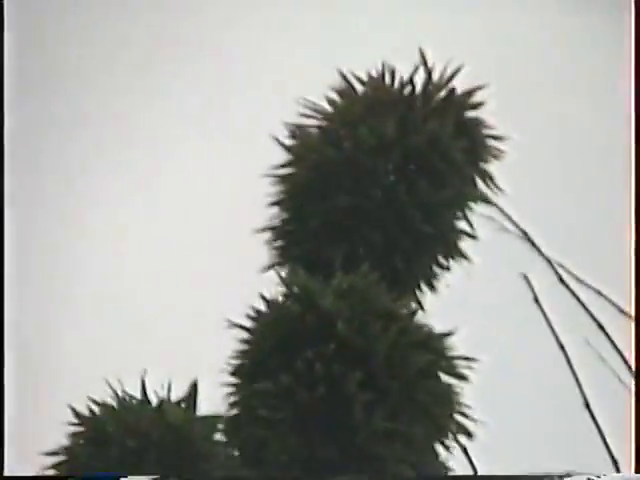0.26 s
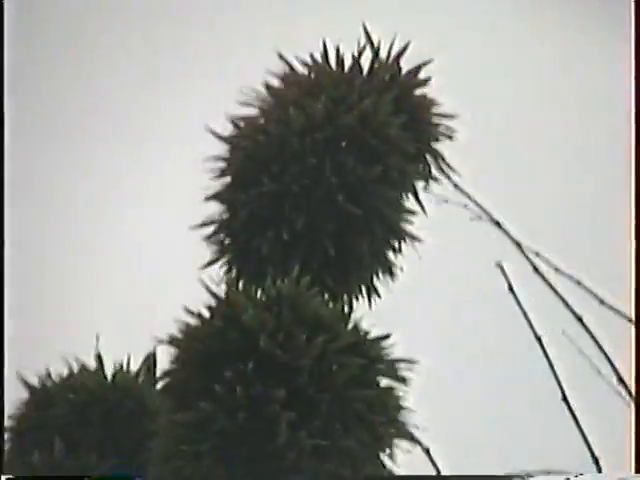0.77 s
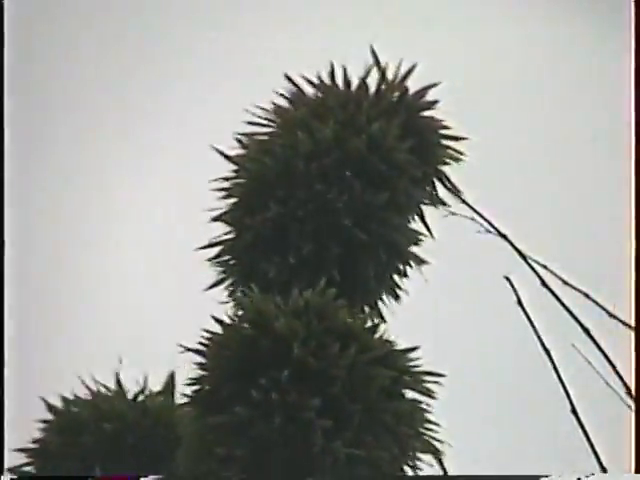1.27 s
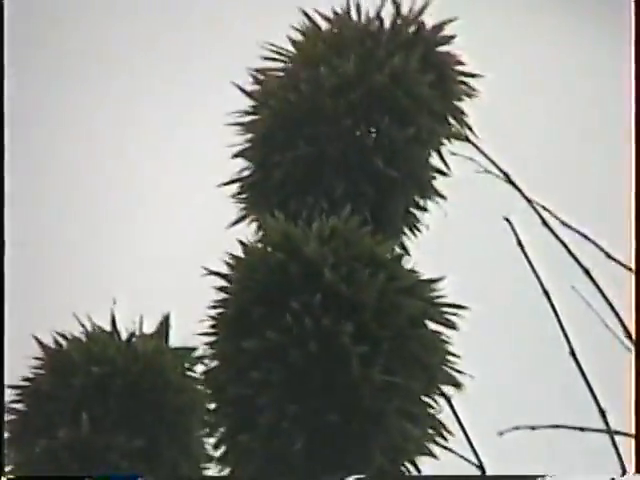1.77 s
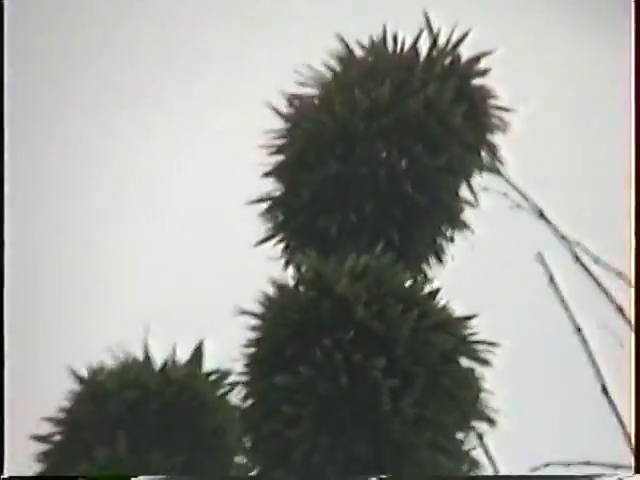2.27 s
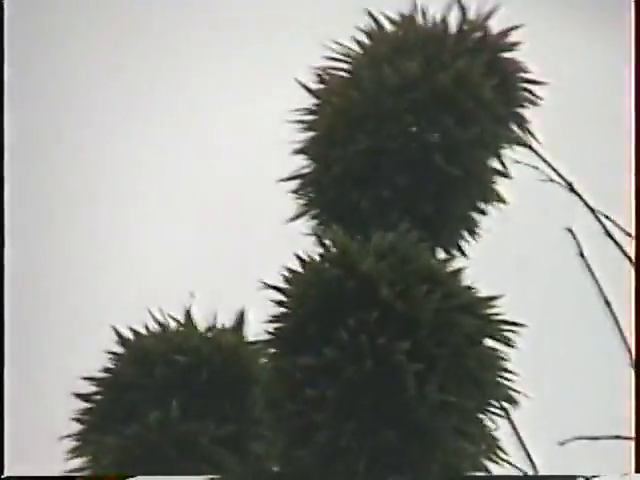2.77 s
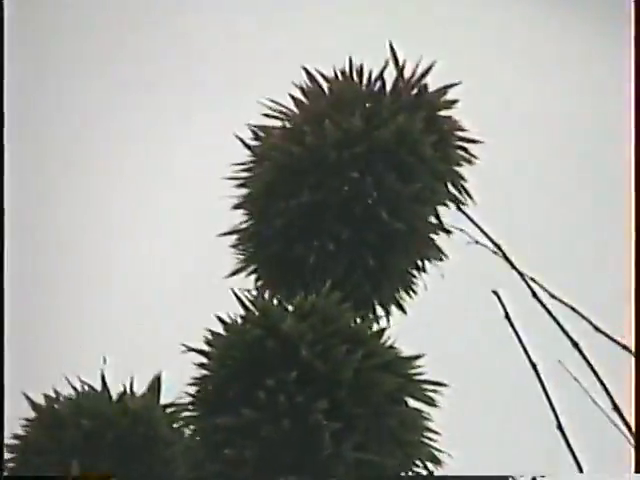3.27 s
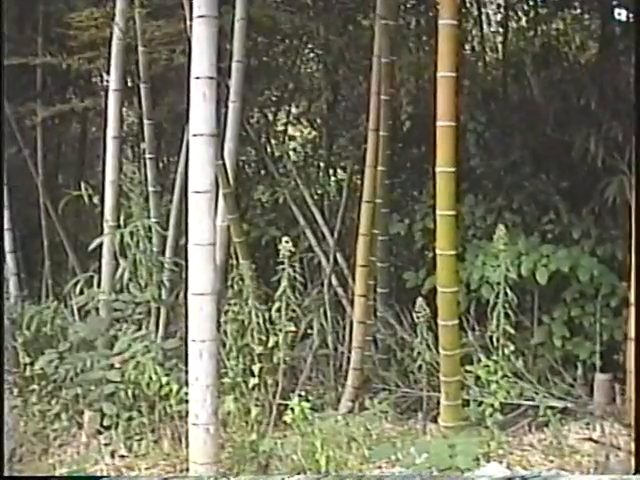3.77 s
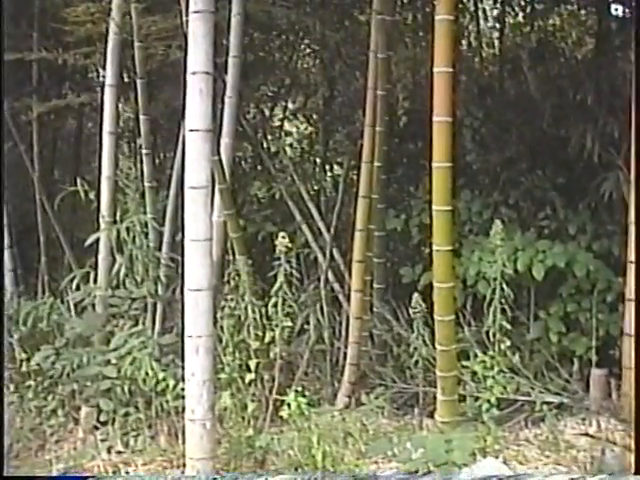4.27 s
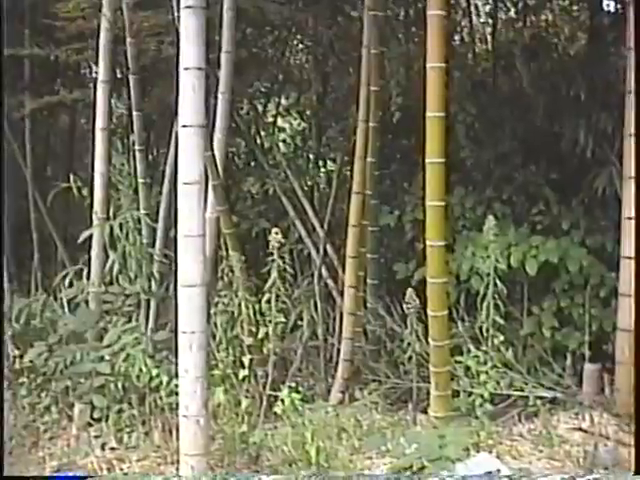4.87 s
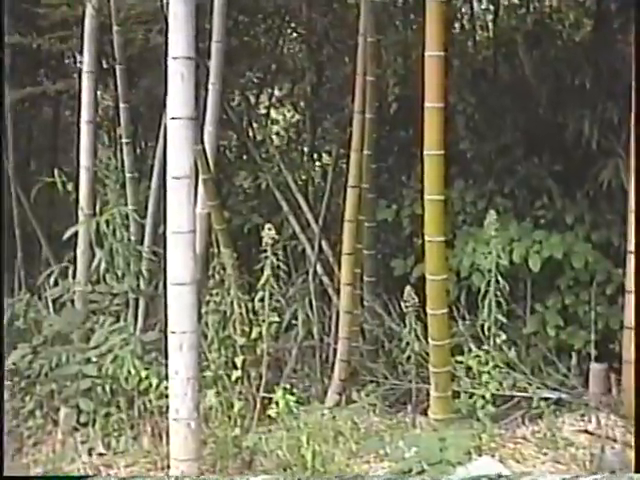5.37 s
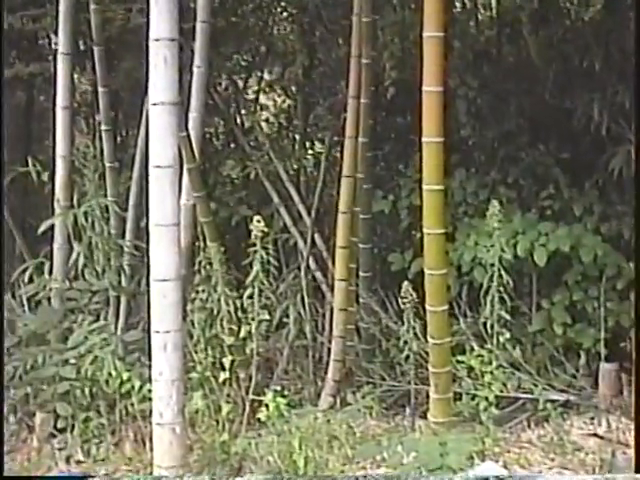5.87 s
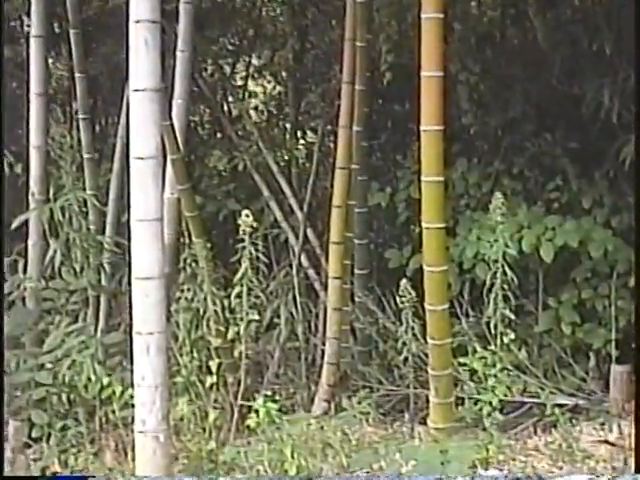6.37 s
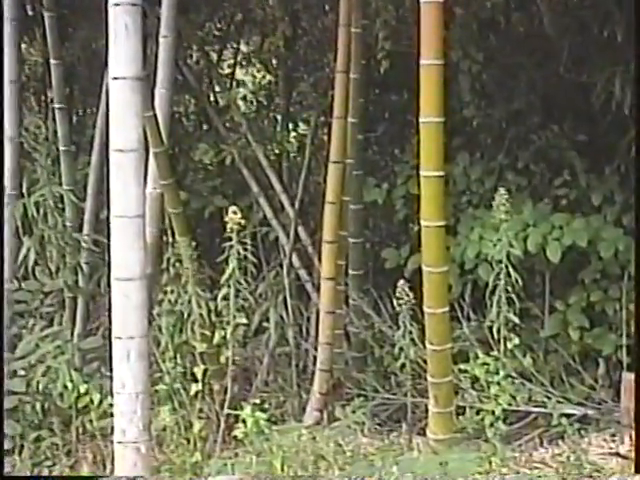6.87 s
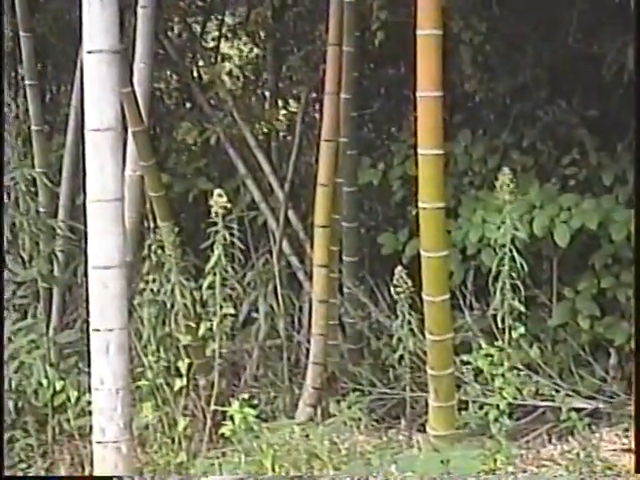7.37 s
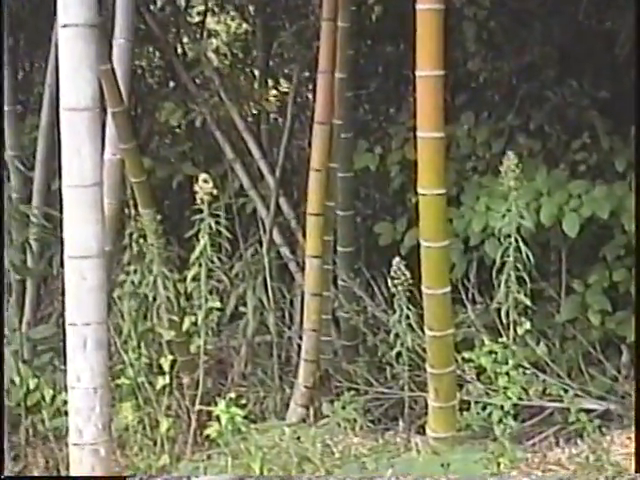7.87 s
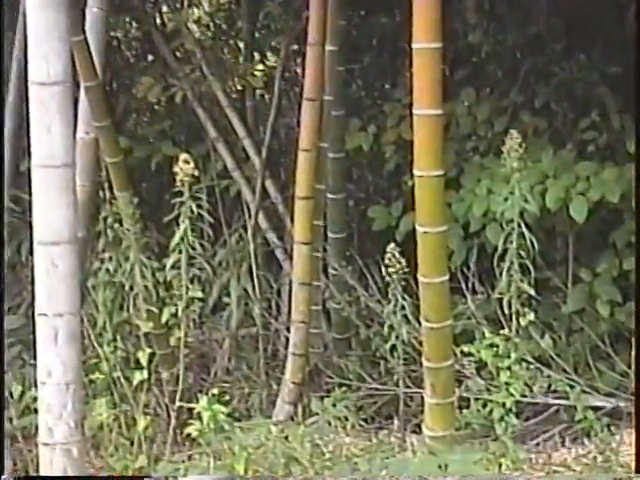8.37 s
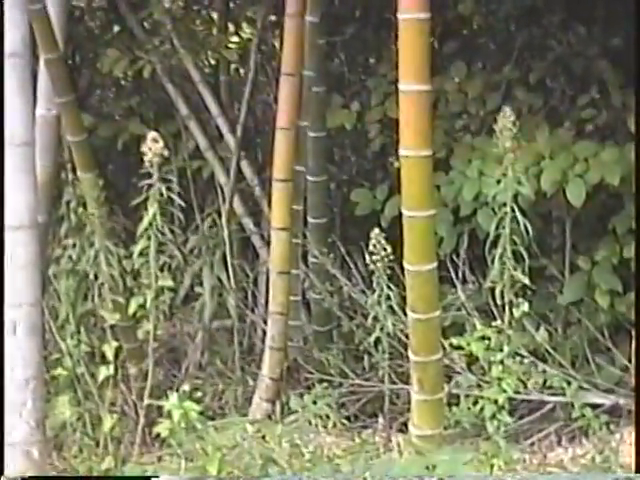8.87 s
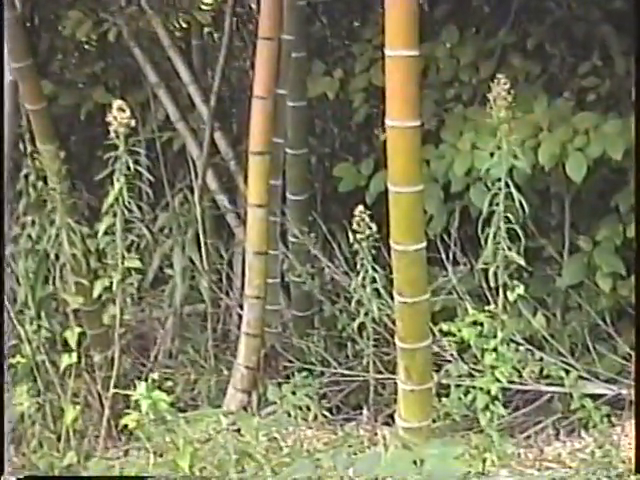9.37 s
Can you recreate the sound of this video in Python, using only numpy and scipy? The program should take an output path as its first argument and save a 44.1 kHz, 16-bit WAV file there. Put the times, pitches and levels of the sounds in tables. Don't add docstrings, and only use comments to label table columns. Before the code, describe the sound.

A quiet leafy garden heard through a small camcorder, almost entirely in the left channel. Its mechanism buzzes steadily and the lens motor ticks quickly for the first three seconds, with a hard tap just before the end. Small birds give short whistles and chips, a cricket trills faintly, a distant crow caws mid-way and a nearer one calls about two seconds later.

```python
import sys
import numpy as np
from scipy import signal
from scipy.fft import rfft, irfft
from scipy.io import wavfile
from scipy.ndimage import uniform_filter1d

SR = 44100
rng = np.random.default_rng(int(sys.argv[2]) if len(sys.argv) > 2 else 0)


def put_to_file(sound):
    columns = np.atleast_2d(sound).T
    safe = np.clip(columns, -1, 1)
    whole_steps = np.round(safe * 32767)
    wavfile.write(sys.argv[1], SR, whole_steps.astype(np.int16))


def amplitude_ratio(level_db):
    exponent = np.asarray(level_db, float) / 20
    return 10 ** exponent


N = 424683
CUT_S = 3.44
FRAME_S = np.arange(N // 128 + 5) * 128 / SR
BIN_HZ = np.fft.rfftfreq(512, 1 / SR)[:, None]


def evened(x):
    return x / np.sqrt(np.mean(x ** 2) + 1e-20)


def read(points, hz):
    f, value = np.transpose(points)
    return np.interp(np.log(hz + 1), np.log(f + 1), value)


def add(mix, s, sound):
    part = mix[round(s * SR):][:len(sound)]
    part += sound[:len(part)]


def unroll(rows):
    s, *columns = np.transpose(rows)
    t = np.arange(s[0], s[-1], 1 / SR)
    return t, [np.interp(t, s, c) for c in columns]


def wander(count, hz):
    size = max(int(SR / hz), 2)
    smooth = uniform_filter1d(rng.standard_normal(count), size)
    return evened(uniform_filter1d(smooth, size))


def resonate(x, hz, width):
    turn = np.exp(2j * np.pi * np.cumsum(hz * np.ones(len(x))) / SR)
    r = np.exp(-np.pi * width / SR)
    return 2 * (turn * signal.lfilter([1 - r], [1, -r], x / turn)).real


def noise(field_db, patchy_db):
    a, b, patches = rng.standard_normal((len(FRAME_S), 257, 3)).T
    patches = uniform_filter1d(patches, size=5, axis=0)
    patches = evened(uniform_filter1d(patches, size=20, axis=1))
    z = (a + 1j * b) * amplitude_ratio(field_db + patchy_db * patches)
    return signal.istft(z, nperseg=512, noverlap=384)[1][:N] * np.sqrt(SR / 512)


def peaks_db(rows, t, rise_db, floor_db):
    s, db, fall = (c[:, None] for c in np.transpose(rows)[:3])
    rise = rise_db * (s - t)
    decay = 10 * (t - s) / np.maximum(fall, .005)
    each = db - np.where(t < s, rise, decay)
    return np.maximum(each.max(0), floor_db), each.argmax(0)


def echoes(x, t60, start_s):
    at = np.arange(int(start_s * SR), SR, 24)
    taps = np.zeros(SR + 24)
    signs = rng.choice([-1., 1.], len(at))
    taps[at + rng.integers(0, 24, len(at))] = signs * amplitude_ratio(-60 * at / SR / t60)
    return signal.oaconvolve(x, taps / np.linalg.norm(taps))[:N]


def sing(out, rows, bend, fade_db):
    for s, length, from_hz, to_hz, db in rows:
        t = np.arange(0, length, 1 / SR)
        u = t / length
        hz = from_hz + (to_hz - from_hz) * bend(u)
        hz = hz * (1 + .009 * wander(len(t), 120))
        flutter = wander(len(t), 200)
        level_db = db + fade_db(u) + 2.5 + 2.6 * (flutter - flutter.mean())
        edges = np.minimum(1, np.minimum(t, length - t) / .002)
        add(out, s, np.sin(2 * np.pi * np.cumsum(hz) / SR) * amplitude_ratio(level_db) * edges)


# start t/s, length t/s, from f/Hz, crest f/Hz, level/dB
WHISTLES = [(.87, 0.073, 2267, 2450, -62), (1.43, 0.033, 4203, 4320, -54), (3.55, 0.058, 3270, 3280, -60),
            (4.028, 0.034, 3360, 3440, -59), (4.57, 0.14, 3190, 3340, -59.5), (4.915, .03, 4100, 4180, -58),
            (5.04, 0.17, 2980, 3440, -61.5), (5.25, 0.15, 3240, 3490, -57),
            (6.012, 0.09, 3200, 3330, -53.5), (6.085, .12, 3350, 3400, -62), (6.54, 0.09, 3200, 3310, -55),
            (1.295, .035, 4200, 4280, -58), (6.04, .02, 4950, 4960, -62), (6.57, 0.036, 4930, 4950, -62),
            (1.225, .03, 3800, 3900, -62), (7.045, 0.11, 3150, 3460, -57), (7.68, 0.035, 3500, 3600, -59),
            (7.725, 0.035, 3560, 3590, -60), (8.172, .1, 2950, 3330, -56.5), (9.44, 0.16, 3320, 3424, -55)]
# start t/s, length t/s, from f/Hz, to f/Hz, level/dB
CLIMBS = [(1.135, 0.024, 3540, 4900, -57), (1.137, .022, 1200, 3600, -57),
          (1.393, 0.033, 3550, 4300, -53.5), (7.645, .04, 3150, 3500, -57),
          (3.985, 0.049, 2980, 3370, -57.5), (8.62, .014, 3300, 4000, -56), (4.865, 0.055, 3350, 4103, -57),
          (2.4, .02, 2060, 2900, -65), (2.66, 0.046, 3070, 3700, -54), (2.7, 0.044, 3640, 3740, -48.5),
          (2.74, 0.076, 3840, 4380, -49), (5.055, 0.047, 4700, 5170, -62), (5.425, 0.031, 3820, 3950, -54),
          (5.452, 0.027, 3980, 4370, -53.5), (8.635, 0.067, 3270, 3850, -52.5),
          (8.699, 0.015, 3780, 4120, -45.5), (8.652, 0.022, 5050, 5450, -60), (8.8, .03, 1900, 2800, -64),
          (8.714, 0.0356, 4180, 4680, -47.5), (8.78, 0.036, 3330, 4120, -51)]
# start t/s, length t/s, from f/Hz, to f/Hz, level/dB
CHIPS = [(1.18, 0.019, 3720, 3350, -56), (1.198, .02, 3200, 2400, -60), (1.295, 0.016, 4950, 4750, -55),
         (4.805, .015, 3340, 3050, -61), (8.788, .01, 5750, 5350, -60), (2.815, 0.015, 4430, 2610, -53),
         (4.053, 0.041, 5140, 4280, -65), (4.06, 0.028, 3310, 2850, -50), (5.478, 0.012, 4310, 3660, -55),
         (6.095, .028, 5490, 3500, -54), (6.117, 0.016, 5640, 4970, -62), (6.128, 0.032, 5000, 4900, -64),
         (6.61, 0.023, 4900, 3800, -59), (7.14, .015, 4600, 3520, -66), (7.7, .03, 5330, 4900, -65),
         (8.25, 0.024, 2740, 2020, -60), (8.267, 0.01, 4060, 3620, -53), (8.277, 0.014, 3640, 3300, -54),
         (8.27, 0.026, 5670, 5100, -60), (8.3, 0.038, 5580, 5450, -65), (8.747, .01, 4700, 4200, -45),
         (8.757, .01, 4150, 3100, -52), (8.757, .018, 4700, 4300, -56), (8.772, .009, 4050, 3350, -59),
         (9.56, 0.031, 3030, 2470, -62)]


def birds():
    crest, droop = 0.504, 0.13

    def arch(u):
        return 1 - np.where(u < crest, 1, droop) * (1 - u / crest) ** 2

    def straight(u):
        return u

    out = np.zeros(N)
    sing(out, WHISTLES, arch, lambda u: np.interp(u, [0, .42, 1], [-5, 0, -8]))
    sing(out, CLIMBS, straight, lambda u: -6 * (1 - u))
    sing(out, CHIPS, straight, lambda u: -1 * u)
    return out + amplitude_ratio(-7.5) * echoes(out, t60=.25, start_s=.006)


# start t/s, length t/s, from f/Hz, to f/Hz, final level/dB
TRILLS = [(0.783, .17, 4650, 4830, -76), (1.452, 1.38, 4570, 4695, -64), (2.618, 0.82, 4670, 4747, -61),
          (1.518, 0.58, 4880, 4900, -65), (5.47, 0.48, 4520, 4560, -62.5), (6.349, 0.26, 4580, 4570, -63.5),
          (6.914, 0.28, 4640, 4690, -61.5), (7.171, .27, 4700, 4720, -57.5), (7.44, .1, 4740, 4750, -64),
          (7.64, 0.15, 4540, 4620, -60), (7.798, 0.72, 4676, 4753, -57), (8.5, 0.16, 4800, 4740, -62),
          (8.768, 0.67, 4645, 4810, -56.5), (9.44, 0.19, 4860, 4810, -66)]


def cricket():
    stroke_hz, start_db, edge_s = 26.13, -4.5, 0.035
    out = np.zeros(N)
    for s, length, from_hz, to_hz, db in TRILLS:
        t = np.arange(0, length, 1 / SR)
        hz = from_hz + (to_hz - from_hz) * t / length
        level_db = db + start_db * (1 - t / length)
        edges = np.minimum(1, np.minimum(t, length - t) / edge_s)
        stroke = np.cumsum(stroke_hz * (1 + 0.015 * wander(len(t), 7.6))) / SR
        gate = .46 + np.clip(.7 - 1.2 * np.cos(2 * np.pi * stroke), 0, .7)
        gate = gate * (1 + .5 * np.cos(8 * np.pi * stroke))
        gate = gate * amplitude_ratio(3 * wander(len(t), 160) + .8 * wander(len(t), 20))
        turn = 2 * np.pi * np.cumsum(hz + 20 * wander(len(t), 200)) / SR
        wing = np.sin(turn) + amplitude_ratio(-27.0) * np.sin(2 * turn)
        add(out, s, edges * amplitude_ratio(level_db) * evened(gate * wing))
    return 1.06 * out + amplitude_ratio(-8.0) * echoes(out, t60=0.29, start_s=0.0034)


# t/s, half the pulse pitch f/Hz, effort level/dB, roughness/1
NEAR_CAW = [
    (6.769, 161, -50, 0.3),
    (6.795, 173.3, -36.5, 0.43),
    (6.845, 181.8, -37, 0.2),
    (6.93, 169.1, -33.5, 0.24),
    (7.005, 160.7, -39, 0.4),
    (7.06, 152, -38, 0.3),
    (7.1, 145.2, -41.5, 0.3),
    (7.15, 136.5, -37, 0.25),
    (7.235, 119, -53, 0.45),
]
# t/s, half the pulse pitch f/Hz, effort level/dB, roughness/1
FAR_CAW = [
    (4.645, 199, -57, .1),
    (4.7, 199.5, -54, .12),
    (4.76, 190, -56, .3),
    (4.81, 187, -54, .35),
    (4.84, 181, -52.5, .25),
    (4.89, 172, -60, .45),
    (4.935, 165, -56, .4),
    (5.0, 158, -68, .6),
]


def crows():
    near = caw(NEAR_CAW, odd_db=-12.5, swell_db=2.5)
    far = caw(FAR_CAW, odd_db=-6, swell_db=0)
    core_hz = np.interp(np.arange(N) / SR, [4.74, 4.84, 4.95], [1200, 1450, 1360])
    far = 1.11 * resonate(far, core_hz, 420)
    near_echo = amplitude_ratio(-10.0) * echoes(near, t60=0.91, start_s=.012)
    far_echo = amplitude_ratio(-4.5) * echoes(far, t60=0.9, start_s=.01)
    return near + near_echo + 0.61 * far + far_echo


# f/Hz, width f/Hz, level/dB
THROAT = [(382, 185, -18), (690, 520, -19.5), (1010, 220, -10), (1235, 150, -2.5), (1366, 150, 2),
          (1545, 110, -2.5), (1697, 176, -12), (2280, 490, -21.5)]


def caw(rows, odd_db, swell_db):
    t, (hz, effort_db, rough) = unroll(rows)
    since = t - t[0]
    length = t[-1] - t[0]
    hz = uniform_filter1d(hz, size=800)
    swell_db = swell_db * np.cos(2 * np.pi * 1351 / hz)
    low_db = -swell_db - 2 * since / length
    turns = np.cumsum(hz * (1 + 0.0056 * wander(len(t), 120))) / SR
    odd_curve = np.interp(since, [0, .07, .16, length], [1, .1, .75, 1.1])
    folds = np.zeros(len(t))
    for k in range(2, 18):
        f = k * hz
        partial_db = (1.2 if k < 7 else 2.4) * wander(len(t), 30)
        partial_db = partial_db - 10 * np.exp(-since / .04) * (f > 1480)
        partial_db = partial_db + (k % 2) * (odd_db * odd_curve - 8 * (k < 7))
        partial_db = partial_db - 45 * np.maximum(f / 1850 - 1, 0) + low_db * (k < 6)
        for dead_hz, width_hz, depth_db in [(880, 95, 12), (655, 22, 9.8), (1460, 36, 12)]:
            partial_db = partial_db - depth_db * np.exp(-((f - dead_hz) / width_hz) ** 2)
        folds = folds + amplitude_ratio(partial_db) * np.cos(2 * np.pi * (k * turns + rng.random()))
    puffs = evened((0.38 + np.exp(-(2 * turns % 1) / 0.091)) * rng.standard_normal(len(t)))
    rough = np.clip(rough, 0, 1)
    drive = (1 - rough) * evened(folds) + 2 * rough * puffs
    voice = np.zeros(len(t))
    for k, (f, width, db) in enumerate(THROAT):
        voice += (-1) ** k * amplitude_ratio(db) * resonate(resonate(drive, f, width), f, width)
    power = uniform_filter1d(uniform_filter1d(voice ** 2, size=900), size=900)
    voice = voice / np.sqrt(power)
    band = signal.butter(6, [2600, 5800], "band", fs=SR, output="sos")
    rasp = amplitude_ratio(-21.5) * evened(signal.sosfilt(band, puffs))
    out = np.zeros(N)
    sound = amplitude_ratio(effort_db) * (amplitude_ratio(swell_db) * voice + rasp)
    add(out, t[0], sound * signal.windows.tukey(len(t), .08))
    return out


DRUM_HZ = 59.955
# f/Hz, width f/Hz, level/dB
SHELL = [(492, 46, -5), (744, 28.3, 4), (1403, 90, -0.5), (1763, 91, 0), (3200, 310, -1), (3710, 470, -8),
         (5050, 210, -6.5)]


def drum_buzz():
    turns = np.arange(N) * DRUM_HZ / SR
    heads = np.diff(np.floor(2 * turns), prepend=0) * (1 + 0.29 * np.sign(turns % 1 - .5))
    heads = heads * amplitude_ratio(2.2 * wander(N, 45))
    ring = np.zeros(N)
    for k, (hz, width, db) in enumerate(SHELL):
        ring += (-1) ** k * amplitude_ratio(db) * resonate(heads, hz, width)
    return amplitude_ratio(-63) * evened(ring)


RING_T = np.arange(1300) / SR
# t/s, peak level/dB
STEPS = [(0.446, -54), (0.501, -56), (0.548, -55), (0.584, -52), (0.635, -52), (0.683, -48), (0.735, -50),
         (0.783, -48), (0.836, -51), (0.917, -52), (1.003, -48), (1.083, -50), (1.134, -54), (1.183, -47),
         (1.233, -47.5), (1.286, -56), (1.333, -50), (1.424, -52), (1.47, -47), (1.517, -49), (1.567, -47),
         (1.617, -46.5), (1.668, -49), (1.717, -47.5), (1.767, -46), (1.815, -52), (1.936, -48),
         (2.018, -49), (2.103, -54), (2.185, -50), (2.27, -47.5), (2.317, -50), (2.37, -48.5), (2.417, -53),
         (2.468, -50.5), (2.518, -51), (2.568, -52), (2.67, -47), (2.717, -51.5), (2.768, -53),
         (2.825, -50), (2.869, -53), (2.968, -52), (3.018, -50), (3.07, -48.5), (3.117, -47.5), (3.17, -54),
         (3.218, -48), (3.268, -51), (3.326, -51), (3.37, -47), (3.42, -51)]


def motor_ticks():
    out, t = np.zeros(N), RING_T
    for (s, db), (a, b) in zip(STEPS, rng.uniform(0.925, 1.088, (len(STEPS), 2))):
        lower = np.sin(2 * np.pi * 520 * a * t)
        upper = 1.28 * (1 - np.exp(-t / 0.0044)) * np.sin(2 * np.pi * 680 * b * t)
        add(out, s, amplitude_ratio(db + 1.5 - 60 * t / 0.051) * (lower + upper) * (1 - np.exp(-t / 0.0022)))
    return out


# t/s, peak level/dB, f/Hz
TAPS = [
    (2.3, -50, 1500),
    (2.87, -35, 1900),
    (2.8803, -38, 2100),
]


def shell_taps():
    out, t = np.zeros(N), RING_T
    for s, db, hz in TAPS:
        modes = np.sin(2 * np.pi * hz * t) + 0.78 * np.sin(2 * np.pi * 1.28 * hz * t)
        add(out, s, amplitude_ratio(db - 60 * t / 0.0064) * modes)
    return out


# t/s, level/dB, f/Hz
SQUEAKS = [(.5, -68, 5900), (2.325, -64, 5840), (2.893, -57, 5900), (3.58, -61, 6200), (3.703, -59.5, 5880),
           (4.133, -61, 6150), (4.25, -59, 5920), (4.827, -58, 5900), (7.155, -58, 5800),
           (7.693, -57, 5900), (8.26, -58, 5880), (8.823, -61, 5900), (9.39, -61, 5900), (9.49, -59, 6200)]


def reel_squeaks():
    out, t = np.zeros(N), RING_T
    for s, db, hz in SQUEAKS:
        glide = hz * (1 + 0.022 * np.exp(-t / 0.007))
        add(out, s, amplitude_ratio(db - 3.5) * np.hanning(len(t)) * np.sin(2 * np.pi * np.cumsum(glide) / SR))
    return out


# t/s, level/dB, time to lose 10 dB t/s, lift of the 4 kHz hump level/dB
RUBS = [(.01, -76, 0.3, -28), (.28, -71.5, 0.13, -1), (.5, -78, 0, -8), (0.749, -65, 0.15, 6.5),
        (1.148, -73, 0, 5), (1.225, -73, 0.5, 1), (1.3, -67.5, .06, 3.5), (1.36, -71, .25, 0),
        (1.78, -73.5, 0.5, -2), (1.856, -69, 0.08, 8.5), (2.3, -74, -2, -9), (2.42, -73.5, 1, -6),
        (2.48, -68, -0.34, -14), (2.82, -72, 0.2, 6), (2.949, -69, 0.09, 5), (3.001, -75, 0.75, -2),
        (3.3, -80, -0.5, 4), (3.43, -73, -0.34, 7), (6.105, -70.5, .08, -3), (8.765, -71, 0.07, 11)]
# f/Hz, density level/dB per Hz
RUSTLE_TONE = [(180, -43), (300, -14), (952, -5.5), (2840, -7), (4000, -7), (4980, -4), (6390, -17.5),
               (12500, -22.5), (16200, -85), (22000, -120)]


def rustle():
    floor_db = np.where(FRAME_S < CUT_S, -84, -100)
    level_db, which = peaks_db(RUBS, FRAME_S, rise_db=442, floor_db=floor_db)
    tone = read(RUSTLE_TONE, BIN_HZ) - read(RUSTLE_TONE, 8030) - 10 * np.log10(1500)
    hump = np.exp(-(np.log((BIN_HZ + 1) / 4000) / 0.16) ** 2)
    field = tone + level_db + hump * np.transpose(RUBS)[3][which]
    return noise(field, patchy_db=1.5) * amplitude_ratio(1.74 * wander(N, 170))


# t/s, level/dB, time to lose 10 dB t/s
SWELLS = [
    (.12, -55.5, 0.2),
    (3.53, -55, 1),
    (4.2, -60, 3),
    (4.75, -57.5, 0.5),
    (5.13, -55, -0.5),
    (5.4, -56.5, 0),
    (6.98, -58, 1),
    (8.2, -59, 2),
    (8.53, -57, 0),
    (8.77, -54.5, 0.6),
]


def drone():
    band = -10 * np.log10(150) - 12 * (np.log((BIN_HZ + 1) / 240) / 0.31) ** 2
    level_db = peaks_db(SWELLS, FRAME_S, rise_db=65, floor_db=-67)[0]
    return noise(band + level_db - 2.5, patchy_db=1.0)


# f/Hz, density level/dB per Hz
AIR_FIRST = [(88, -55), (150, -12), (239, -6.5), (360, -7.5), (503, -2.5), (1160, -5.5), (1450, -6.5),
             (2110, -8.5), (4770, -7), (5600, -12), (6230, -23), (8190, -18), (12800, -28), (16600, -60),
             (22000, -120)]
AIR_SECOND = [(88, -56), (150, -14), (206, -3), (573, 0), (716, 0.5), (2030, -3.5), (3350, -3.5),
              (4960, -3.5), (5550, -8.5), (6370, -17.5), (8190, -15), (11700, -21), (12800, -22.5),
              (16600, -63), (22000, -120)]


def air():
    tone = np.where(FRAME_S < CUT_S, read(AIR_FIRST, BIN_HZ), read(AIR_SECOND, BIN_HZ))
    tone = tone - 10 * np.log10(np.sum(10 ** (tone / 10), axis=0) * SR / 512)
    return noise(tone - 55, patchy_db=1.34)


# t/s, level/dB, time to lose 10 dB t/s
BURSTS = [(.15, -71, 1.5), (.92, -68.5, 0.55), (1.25, -68, 0.4), (1.74, -68, 0.5), (2.68, -70, 1.4),
          (3.45, -71, 1), (4.3, -72, 2), (5.06, -66, 0.13), (6.1, -67, 0.5), (6.55, -68.5, 0.1),
          (6.83, -67.5, 2), (7.63, -69.5, 1.3), (8.0, -65, 0), (8.47, -67, 1.3), (9.2, -66, .4)]
# f/Hz, density level/dB per Hz
RUMBLE = [(20, -87.5), (70, -85.5), (130, -88.5), (230, -107), (270, -104), (330, -125)]


def rumble():
    burst_db = peaks_db(BURSTS, FRAME_S, rise_db=90, floor_db=-92)[0]
    burst_db = 1.3 * (np.interp(np.arange(N) / SR, FRAME_S, burst_db) + 71) + 3 * wander(N, 20)
    return noise(read(RUMBLE, BIN_HZ), patchy_db=2.5) * amplitude_ratio(burst_db + 4.5)


# f/Hz, density level/dB per Hz
IDLE = [(20, -99), (80, -90), (100, -125), (200, -140)]


def flutter():
    low = signal.butter(6, 85, fs=SR, output="sos")
    return signal.sosfilt(low, noise(read(IDLE, BIN_HZ), patchy_db=4.5))


# t/s, level/dB, f/Hz
BLIPS = [(0.732, -62.9, 205), (0.915, -53.7, 134), (1.081, -63.1, 204), (1.173, -63.0, 206),
         (1.282, -64.7, 114), (1.358, -63.3, 208), (1.618, -68.1, 194), (1.753, -63.1, 207),
         (1.847, -62.8, 202), (1.893, -63.0, 204), (2.68, -53.7, 133), (2.745, -65.3, 116),
         (2.799, -62.9, 204), (2.847, -62.7, 205), (2.938, -63.1, 207), (3.078, -63.2, 204),
         (3.119, -62.3, 190), (3.494, -58.7, 226), (3.749, -64.3, 149), (3.797, -62.9, 208),
         (4.075, -62.8, 201), (4.281, -63.9, 202), (4.425, -60.4, 131), (4.54, -65.6, 213),
         (4.726, -69.6, 214), (4.888, -68.4, 186), (5.052, -62.7, 203), (5.098, -63.2, 209),
         (5.207, -69.0, 226), (5.746, -67.1, 199), (6.164, -63.3, 206), (6.21, -53.5, 134),
         (6.296, -69.0, 201), (6.326, -67.8, 211), (6.815, -63.3, 207), (7.026, -62.7, 206),
         (7.069, -63.0, 207), (7.346, -62.5, 187), (7.396, -62.8, 205), (7.532, -66.3, 184),
         (7.583, -62.6, 208), (7.649, -53.4, 134), (7.827, -61.3, 162), (7.86, -63.1, 208),
         (7.955, -62.8, 206), (8.0, -62.8, 207), (8.161, -68.6, 227), (8.394, -63.8, 201),
         (8.439, -62.3, 130), (8.508, -53.7, 135), (8.579, -62.7, 206), (8.697, -62.9, 208),
         (8.737, -57.8, 169), (8.836, -62.6, 201), (8.882, -63.1, 206), (8.922, -65.1, 113),
         (9.045, -62.8, 204), (9.205, -53.7, 134), (9.3, -63.0, 202)]


def blips():
    out = np.zeros(N)
    for (s, db, hz), phase in zip(BLIPS, rng.random(len(BLIPS))):
        length = .034 if hz > 160 else .022
        t = np.arange(0, length, 1 / SR)
        pair = np.sin(2 * np.pi * (hz * t + phase)) + .5 * np.sin(2 * np.pi * (hz + 55) * t)
        add(out, s - length / 2, amplitude_ratio(db + 2) * np.hanning(len(t)) * pair)
    return out


def whine():
    t = np.arange(N) / SR
    chop = 1 + 1.34 * (t * DRUM_HZ % 1 < .12)
    return amplitude_ratio(-76.5) * chop * np.sin(2 * np.pi * 8001.7 * t)


# f/Hz, density level/dB per Hz
HISS = [(300, -111), (550, -109), (1100, -112), (4300, -113), (6500, -111), (11900, -111), (12250, -135)]


def hiss():
    return noise(read(HISS, BIN_HZ), patchy_db=-2.0)


def scene():
    bass_cut = signal.butter(8, 165, "high", fs=SR, output="sos")
    wash = signal.sosfilt(bass_cut, air() + drone() + rustle())
    camera = drum_buzz() + motor_ticks() + shell_taps() + reel_squeaks()
    left = 2 * (wash + birds() + cricket() + crows() + camera)
    return np.array([left, amplitude_ratio(-50) * left])


def roll_off(x):
    return signal.sosfilt(signal.butter(12, 12860, fs=SR, output="sos"), x)


OFFSET = [
    [.1227],
    [.1204],
]


def record(dry):
    left = rumble() + amplitude_ratio(9.0) * flutter()
    right = flutter() + blips()
    wired = dry + np.array([hiss() for _ in dry]) + np.array([left, right]) + whine()
    top = irfft(rfft(wired) * (np.fft.rfftfreq(N, 1 / SR) > 12170), N)
    later = np.arange(N) / SR > CUT_S
    dropped = uniform_filter1d(1. * (wander(N, 14) > 0) * later, size=400)
    mix = wired - dropped * top + np.array(OFFSET)
    return roll_off(mix)


dry = scene()
out = record(dry)
put_to_file(out)
```